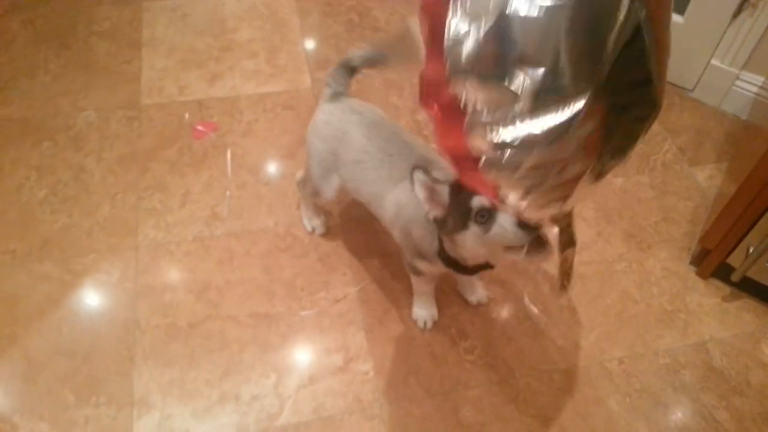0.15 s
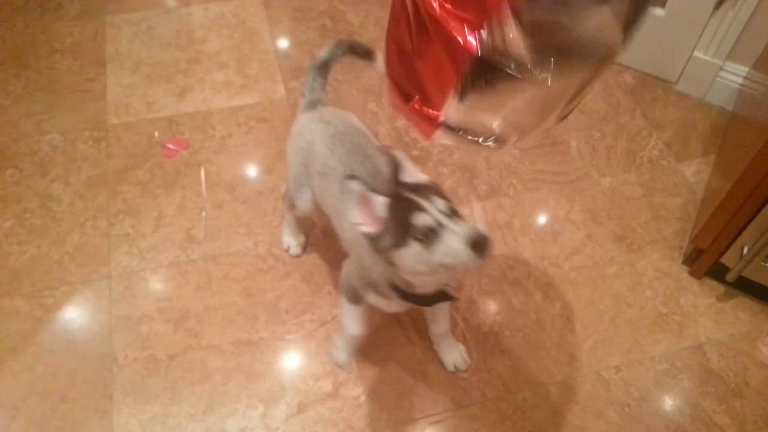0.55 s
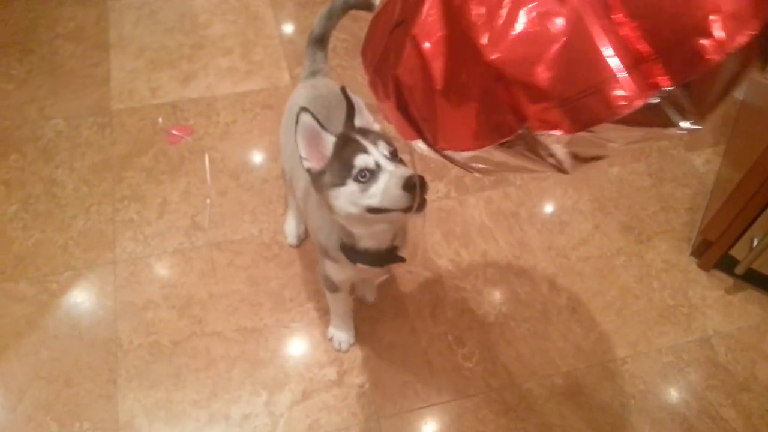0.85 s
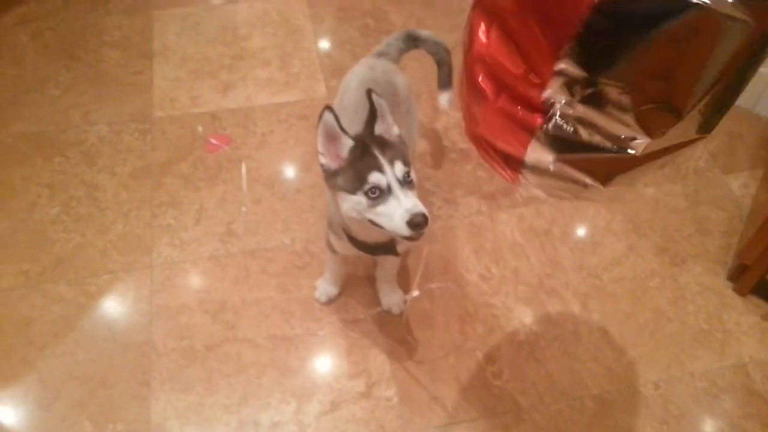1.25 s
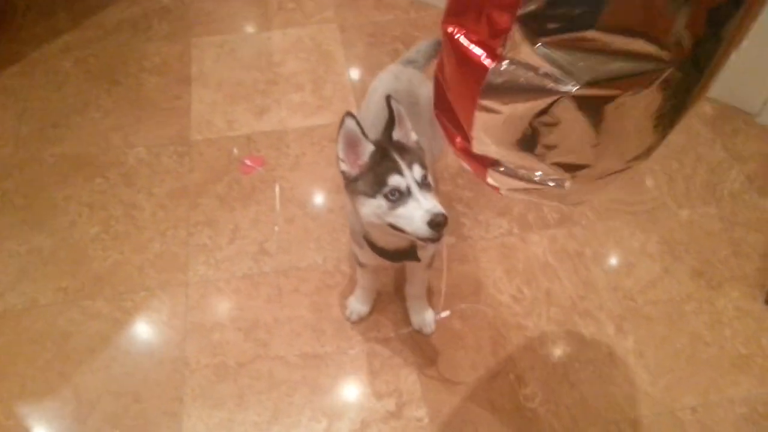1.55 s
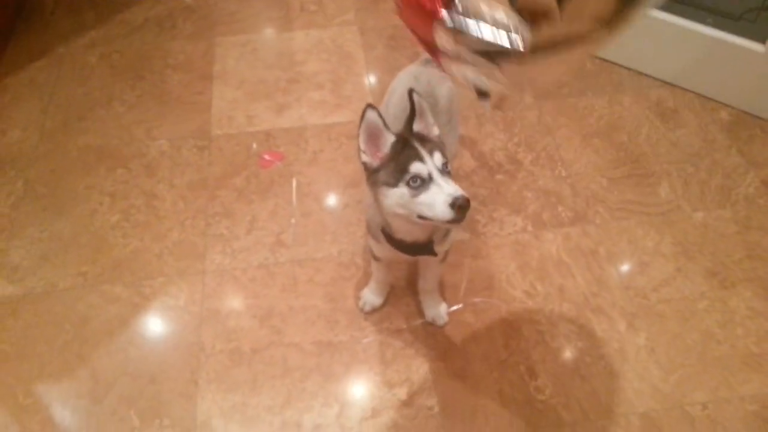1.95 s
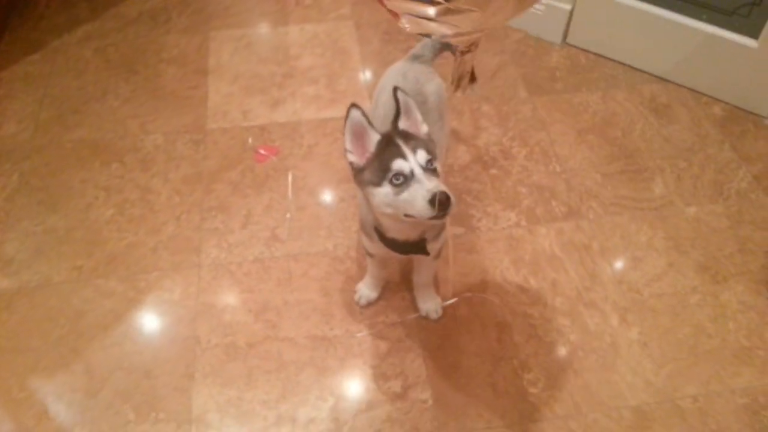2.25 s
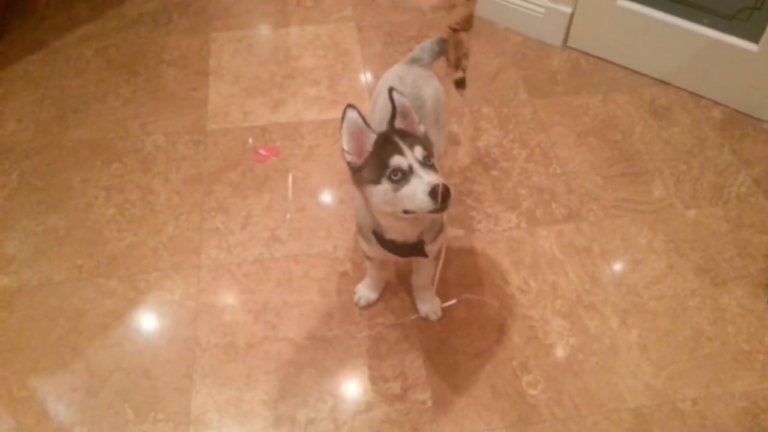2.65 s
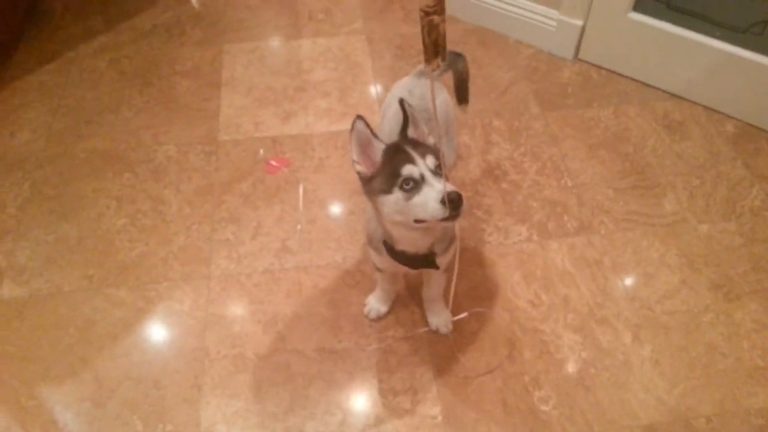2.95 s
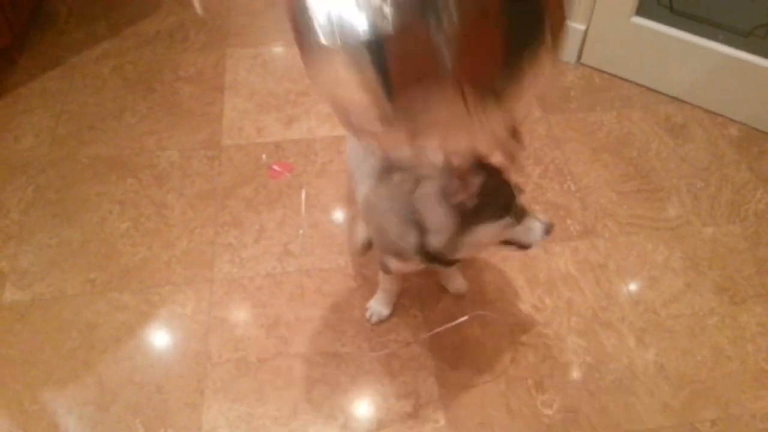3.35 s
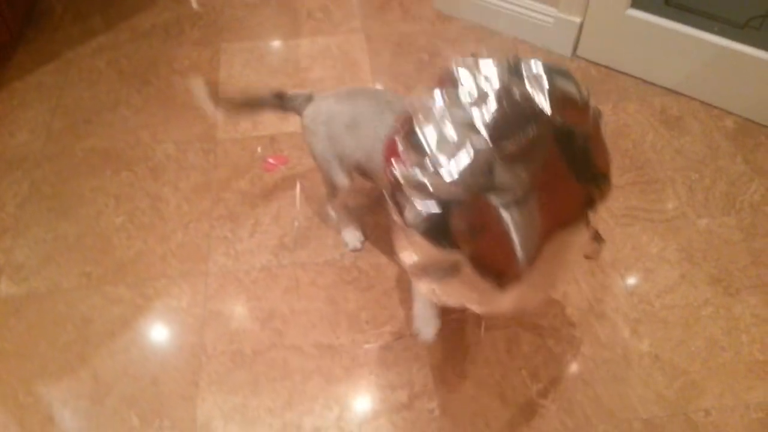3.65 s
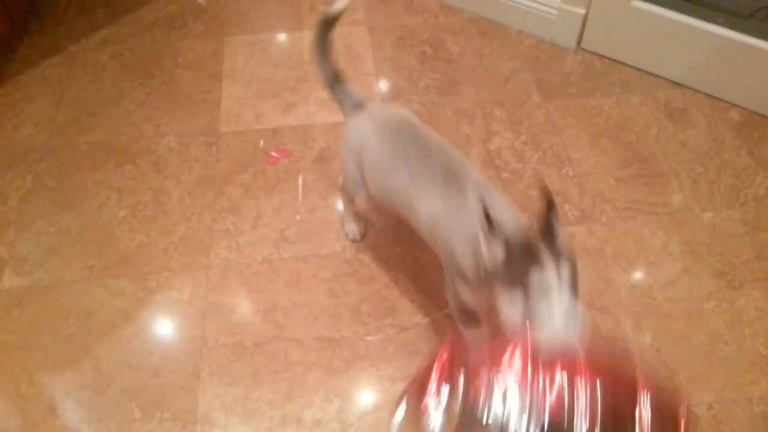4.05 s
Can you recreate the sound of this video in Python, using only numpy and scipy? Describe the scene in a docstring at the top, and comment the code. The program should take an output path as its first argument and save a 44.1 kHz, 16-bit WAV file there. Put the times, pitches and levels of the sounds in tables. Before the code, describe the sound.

Low, wavering motor drone from next door under everything. Foil rustles and snaps loudly at first, with an early thump of paw or nose, then fades to small creases. One breathy puppy huff breaks the quiet, foil stirs again, and a hard cluster of snaps and knocks closes it. Stereo phone microphone about a step away, light hiss, reflective stone-floored hall.

```python
"""A puppy chases a foil balloon over a stone floor in an echoing hall, a step from a hand-held phone.
A motor drones next door throughout: shaft orders, whines and hum over a rumble, with faint fuzzy tones.
At first the foil rustles and snaps (tiny creases and single flips), with knocks of paw or nose; it thins out.
Near 2.3 s the puppy huffs once (shaped air noise); from 3.2 s foil picks up again, with knocks near 4 s."""
import sys
import numpy as np
from scipy import signal
from scipy.fft import rfft, irfft
from scipy.io import wavfile

SR = 44100
rng = np.random.default_rng(int(sys.argv[2]) if len(sys.argv) > 2 else 0)


def rack_gain(trim_db):
    """Turn a fader trim in dB into the linear factor to multiply a signal by."""
    fader = np.asarray(trim_db, float)
    return 10 ** (fader / 20)


def wrap_up_sound(samples):
    """Save the sound to the file named by the first command line argument, as 16-bit audio."""
    columns = np.atleast_2d(samples).T
    # keep every value between -1 and 1, then stretch to whole-number steps
    tamed = np.clip(columns, -1, 1)
    steps = np.round(tamed * 32767).astype(np.int16)
    wavfile.write(sys.argv[1], SR, steps)


N = 185437


def evened(x):
    """Scales to rms 1."""
    return x / np.sqrt(np.mean(x ** 2) + 1e-20)


def read(points, hz):
    """Reads a spectrum table on a log frequency axis."""
    f, value = np.transpose(points)
    return np.interp(np.log(hz + 1), np.log(f + 1), value)


def curve(points):
    """Reads a time table at every sample."""
    s, value = np.transpose(points)
    return np.interp(np.arange(N) / SR, s, value)


def add(mix, s, sound):
    """Mixes a sound in at time s."""
    part = mix[round(s * SR):][:len(sound)]
    part += sound[:len(part)]


def colour(x, db_of):
    """Minimum-phase (causal) filter from a gain rule in dB over Hz."""
    gain_db = np.maximum(db_of(abs(np.fft.fftfreq(4096, 1 / SR))), -100)
    log_gain = np.log(rack_gain(gain_db))
    taps = np.fft.ifft(np.exp(np.conj(signal.hilbert(log_gain)))).real[:2048]
    return signal.oaconvolve(x, taps[None] if x.ndim > 1 else taps, axes=-1)[..., :N]


def band_part(x, hz, kind):
    """Zero-phase low or high part of a sound."""
    return signal.sosfiltfilt(signal.butter(2, hz, kind, fs=SR, output="sos"), x)


def diffuse(x):
    """Gives two unrelated signals the left-right likeness of a diffuse field."""
    # diffuse sound at two ports: (frequency [Hz], left-right correlation [-1 to 1])
    likeness = [(60, 0.79), (150, 0.9), (380, 0.8), (940, 0.18), (2350, 0.11), (5880, -0.27), (14700, 0.34)]
    z = rfft(x)
    same = np.clip(read(likeness, np.fft.rfftfreq(N, 1 / SR)), -1, 1)
    return irfft([z[0], same * z[0] + np.sqrt(1 - same ** 2) * z[1]], N)


def wander(top_hz, count=16):
    """Slow random curve of rms 1: sines of random phase from 0.3 Hz to top_hz."""
    t, hz = np.arange(0, N, 64) / SR, np.geomspace(.3, top_hz, count)[:, None]
    sines = np.sin(2 * np.pi * (hz * t + rng.random(hz.shape)))
    slow = (sines / np.sqrt(hz)).sum(0)
    return np.interp(np.arange(N), t * SR, evened(slow))


def hall(x, wet_db, t60_scale, lag_samples=5):
    """Direct sound, earlier at the left port by the lag, plus sparse echoes dying band by band."""
    # reverberation: (frequency [Hz], t60 at scale 1 [s])
    hall_t60 = [(300, 0.94), (1300, 0.36), (3500, 0.59), (9000, 0.12), (15000, 0.78)]
    echoes = np.zeros((2, SR))
    # one echo in every 20 samples, of random sign
    at = np.arange(130, SR - 20, 20) + rng.integers(0, 20, (2, (SR - 131) // 20))
    np.put_along_axis(echoes, at, rng.choice([-1., 1.], at.shape), 1)
    hz, t, z = signal.stft(echoes, SR, nperseg=256)
    decay = rack_gain(-60 * t / (t60_scale * read(hall_t60, hz))[:, None])
    tail = signal.istft(z * decay, SR, nperseg=256)[1][:, :SR]
    tail = diffuse(np.pad(tail, [(0, 0), (0, N - SR)]))[:, :SR]
    tail = rack_gain(wet_db) * tail / np.linalg.norm(tail[0])
    # direct path at sample 20, leaving room for negative lags
    tail[[0, 1], [20, 20 + lag_samples]] += 1
    return signal.oaconvolve(x[None], tail, axes=1)[:, 20:N + 20] / np.sqrt(1 + rack_gain(2 * wet_db))


def spread(x, wet_db, t60_scale, count=5):
    """A wide, moving source: every 128 samples it draws a spot, each with its own path and echoes."""
    spot = np.repeat(rng.integers(0, count, N // 128 + 1), 128)[:N]
    return sum(hall(x * (spot == k), wet_db, t60_scale, 5 * k - 7) for k in range(count))


def whistles():
    """Faint fuzzy tones: narrow noise bands, unlike at the two ports, fading in and out."""
    # (centre [Hz], width [Hz], level [dB], start [s], end [s])
    fuzzy_tones = [(7900, 60, -85, -.1, 4.3), (2590, 25, -78, 1.3, 2.3), (2590, 20, -75, 2.7, 3.3),
                   (3420, 40, -71, 3.15, 3.75)]
    out, t = np.zeros((2, N)), np.arange(N) / SR
    for hz, width_hz, db, start_s, end_s in fuzzy_tones:
        pole = np.exp(-np.pi * width_hz / SR)
        slow = signal.lfilter([1], [1, -pole], rng.standard_normal((2, 2, N)))
        band = slow[0] * np.cos(2 * np.pi * hz * t) + slow[1] * np.sin(2 * np.pi * hz * t)
        fade = np.clip(np.minimum(t - start_s, end_s - t) / 0.06, 0, 1)
        out += rack_gain(db) * evened(band) * fade
    return out


def motor(orders_db=-51.0, waver_db=4.5):
    """Shaft orders, whines and a beating hum over a rumble; orders and upper rumble throb once a turn."""
    # where in the turn the orders peak: (low orders [turns], high orders [turns])
    throb_turns = (.3, .67)
    # shaft orders, the sixth set apart below: (multiple of shaft speed, relative level [dB])
    shaft_orders = [(1, -44), (2, -57), (3, -55), (4, -10.5), (5, -27), (6, 0), (7, -2.5), (8, -36),
                    (9, -20.5), (10, -23), (11, -11), (12, -8.5), (13, -20), (14, -34), (15, -10.5),
                    (16, -12), (17, -11.5), (18, -16), (19, -12.5), (20, -17), (21, -9.5), (22, -5),
                    (23, -2), (24, -20)]
    # strongest order, the sixth, which wavers: (time [s], level [dB])
    sixth_level = [(0.0, -50.5), (0.21, -52), (0.28, -45.5), (0.71, -44), (0.83, -57), (0.99, -45),
                   (1.37, -45), (1.64, -52), (1.75, -46), (1.82, -52), (2.02, -44.5), (2.14, -51.5),
                   (2.21, -43.5), (2.32, -66), (2.37, -45), (2.77, -47), (2.9, -52.5), (3.27, -43.5),
                   (3.49, -49.5), (3.63, -56.5), (3.7, -48), (4.2, -47.5)]
    # whines, each wavering slightly: (frequency [Hz], mean level [dB])
    whine_tones = [(182, -60), (251, -62.5), (1051, -73.5), (1180, -77.5)]
    # two close tones beating: (mean frequency [Hz], level of each [dB], a null [s], null spacing [s])
    hum_hz, hum_db, null_s, period_s = (58.7, -61., 2.07, 2.03)
    # rumble spectrum: (frequency [Hz], relative density [dB per Hz])
    rumble_colour = [(30, -41.5), (45, -27), (92, -15), (125, -3.5), (150, -1), (210, -7.5), (308, -2.5),
                     (374, -19), (480, -9.5), (545, -7), (700, -14.5), (873, -27), (1050, -30.5),
                     (1500, -41), (2620, -38), (4000, -42), (5200, -67)]
    # rumble: (time [s], level [dB])
    rumble_level = [(0.0, -47.5), (0.55, -47), (0.77, -50), (0.98, -46), (1.57, -48.5), (2.46, -44.5),
                    (3.08, -48), (3.25, -43.5), (3.53, -48.5), (3.75, -49.5), (4.02, -42), (4.2, -46.5)]
    shaft_hz, throb_depth, scatter_turns = 24.29, .5, .07
    t = np.arange(N) / SR
    low, high = (t * shaft_hz - start for start in throb_turns)

    # orders nearly in step add up to one knock a turn
    orders = np.zeros(N)
    for k, db in shaft_orders:
        if k != 6:
            turns = k * (low if k < 9 else high) + scatter_turns * rng.standard_normal()
            orders += rack_gain(db + waver_db * wander(5.)) * np.cos(2 * np.pi * turns)
    sixth = np.sqrt(2) * rack_gain(curve(sixth_level)) * np.cos(2 * np.pi * 6 * low)
    tones = rack_gain(orders_db) * evened(orders) + sixth
    for hz, db in whine_tones:
        tones += np.sqrt(2) * rack_gain(db + 0.61 * wander(4.0)) * np.sin(2 * np.pi * hz * t)
    beat = np.sin(np.pi * (t - null_s) / period_s)
    tones += 2 * rack_gain(hum_db) * beat * np.sin(2 * np.pi * hum_hz * t)

    rumble = diffuse(colour(rng.standard_normal((2, N)), lambda hz: read(rumble_colour, hz)))
    rumble += throb_depth * np.cos(2 * np.pi * high) * band_part(rumble, 330, "high")
    return tones + rack_gain(curve(rumble_level)) * evened(rumble)


def huff(chest_hz=900, hiss_hz=9500, rough_db=1.0):
    """One rush of air noise swells fast and runs out, filling the hall from all sides; hiss dies first."""
    # breath spectrum: (frequency [Hz], relative density [dB per Hz])
    breath_colour = [(150, -41), (280, -11), (600, -8), (1700, -4), (3000, -7.5), (5000, -9), (7500, -12),
                     (9500, -19), (13000, -36), (15000, -64)]
    start_s, level_db, rise_s = 2.297, -31, 0.025
    fall_s, bend = 0.3, 1.67  # down 20 dB after fall_s, ever faster
    chest_db, hiss_db, hiss_sag_db_per_s = -5.5, -6, 83  # against the middle band
    air = diffuse(colour(rng.standard_normal((2, N)), lambda hz: read(breath_colour, hz)))
    chest = band_part(air, chest_hz, "low")
    hiss = band_part(air, hiss_hz, "high")
    t = np.maximum(np.arange(N) / SR - start_s, 0)
    breath = evened(air - chest - hiss) + rack_gain(chest_db) * evened(chest)
    breath += rack_gain(hiss_db - hiss_sag_db_per_s * t) * evened(hiss)
    flow = (1 - np.exp(-t / rise_s)) ** 2 * rack_gain(level_db - 20 * (t / fall_s) ** bend)
    return breath * flow * rack_gain(rough_db * wander(72.0))


def knocks():
    """Paw or nose blows: a low push that rings briefly and dies, sagging in pitch."""
    # (time [s], starting level [dB], settled pitch [Hz], t60 [s], at least 5 ms)
    blows = [(0.2882, -17.5, 280, 0.013), (0.996, -45, 850, 0.11), (3.929, -37, 507, 0.021),
             (3.9646, -24.5, 900, 0.031), (3.9813, -31.5, 223, 0.089), (4.013, -54, 302, .015),
             (4.062, -32.5, 540, 0.024)]
    out, t = np.zeros(N), np.arange(4000) / SR
    for s, peak_db, hz, t60_s in blows:
        turns = hz * (t + 0.00094 * (1 - np.exp(-t / 0.00062)))
        add(out, s, rack_gain(peak_db - 60 * t / max(t60_s, .005)) * np.sin(2 * np.pi * turns))
    return out


def foil_parts(x, cross_hz=3800):
    """Foil colour split into the hollow body and the thin crinkle above it."""
    # foil spectrum: (frequency [Hz], relative density [dB per Hz])
    foil_colour = [(200, -19.5), (350, -3.5), (800, -4.5), (2000, -2), (4500, -5.5), (6500, -7),
                   (8500, -7.5), (11000, -19.5), (14000, -24.5), (15500, -55)]
    low_pass = lambda hz: -10 * np.log10(1 + (hz / cross_hz) ** 6)
    high_pass = lambda hz: -10 * np.log10(1 + (cross_hz / (hz + 1)) ** 6)
    body = colour(x, lambda hz: read(foil_colour, hz) + low_pass(hz))
    crinkle = colour(x, lambda hz: read(foil_colour, hz) + high_pass(hz))
    return body, crinkle


def flips(events, shape):
    """Foil colour on a set of bursts; shape gives a burst from time over length and a noise."""
    thin, dull, t = np.zeros(N), np.zeros(N), np.arange(2000) / SR
    frays = rng.standard_normal((len(events), len(t)))
    for (s, peak_db, dull_db, length_s), fray in zip(events, frays):
        flip = rack_gain(peak_db) * shape(t / max(length_s, 1e-4), fray)
        add(thin, s, flip)
        add(dull, s, rack_gain(dull_db) * flip)
    # scale so that a unit click peaks at 1 in either part
    body, crinkle = foil_parts(np.eye(1, N)[0])
    return foil_parts(thin)[1] / abs(crinkle).max() + foil_parts(dull)[0] / abs(body).max()


def snaps():
    """Single creases of foil flipping over: each is one click that frays out."""
    # (time [s], click level [dB], dullness: body against crinkle [dB])
    creases = [(0.0743, -20, -13), (0.2881, -26, -1), (0.2955, -25, -11), (0.3683, -27, -15),
               (0.3818, -26, -10), (0.6185, -27, -22), (0.6252, -28, -21), (0.9051, -35, -11),
               (0.9103, -35, -15), (0.9293, -36, -24), (1.0881, -36, -12), (1.1004, -34, 0),
               (1.1095, -31, -10), (1.1608, -39, -7), (1.171, -37, -12), (1.2649, -37, -7),
               (1.3217, -31, -10), (1.3548, -36, -6), (1.4165, -36, -9), (1.4221, -37, -8),
               (1.9561, -44, -11), (2.0094, -44, -5), (2.0174, -46, -9), (2.0564, -53, -5),
               (2.1188, -49, -9), (3.257, -27, -12), (3.2653, -37, -15), (3.2853, -27, -20),
               (3.401, -29, -20), (3.4075, -21, -23), (3.7909, -32, -13), (3.8345, -25, -13),
               (3.9156, -24, -8), (3.9655, -26, -3), (3.9847, -21, -3), (3.9917, -12, -7),
               (3.9989, -24, -7)]
    ring_down_s = .0003
    events = [tuple(row) + (ring_down_s,) for row in creases]
    return flips(events, lambda u, fray: np.exp(-u) * np.where(u == 0, 1, 0.3 * fray))


def crumples():
    """Bunches of creases under a bite or a paw: noise that swells and dies."""
    # (time [s], burst level [dB], dullness: body against crinkle [dB], swell time [s])
    bunches = [(0.0617, -25, -16, 0.0027), (0.188, -28, -4, 0.0034), (0.3754, -29.5, -3.5, 0.0067),
               (0.394, -37, -28, 0.0068), (0.631, -59, -16, 0.0023), (1.1074, -51, -21, 0.002),
               (1.2744, -45, 3, 0.0025), (3.2342, -41, -6.5, 0.0042), (3.4118, -55, -14, 0.0017),
               (3.9218, -29, -0.5, 0.003), (3.9739, -26, -2, 0.0049), (4.0585, -33, -3, 0.0031)]
    return flips(bunches, lambda u, fray: .5 * u * np.exp(1 - u) * fray)


def rustle(per_s=6000, clump_db=1.5):
    """Thousands of tiny creases a second, in clumps, a few larger; shoves swell out of a faint stirring."""
    # shoves or tugs: (start [s], crinkle level [dB], hold [s], time to fall 20 dB [s], at least 2 ms,
    # body against crinkle [dB])
    shoves = [(0.002, -29.5, 0.01, 0.12, -8), (0.055, -32, 0.021, 0.03, -2),
              (0.187, -35, 0.0073, -0.02, -5), (0.286, -37.5, 0.0049, 0.03, -1),
              (0.363, -38.5, 0.038, -0.03, -7.5), (0.616, -42, .01, .09, -6.5),
              (0.905, -50.5, 0.005, 0.24, -3), (0.929, -48.5, 0.014, -0.3, -9), (1.035, -58, .03, 0.24, 11),
              (1.064, -48, 0.024, 0.54, -1.5), (1.096, -40, 0.0074, 0.07, -6),
              (1.158, -50.5, 0.051, -0.09, -6), (1.26, -42, 0.021, -0.05, -6),
              (1.32, -43, 0.018, -0.05, -4), (1.351, -46.5, 0.013, 0.05, -5),
              (1.412, -42.5, 0.012, -0.02, -5.5), (1.94, -57, 0.02, .03, -13),
              (2.004, -55, 0.0099, .06, -2.5), (2.11, -62, 0.0097, 0.2, -12), (2.226, -68.5, .006, 0.1, 10),
              (2.77, -62, 0.029, -0.33, 4), (3.11, -53, 0.019, 0.73, -3.5),
              (3.219, -49.5, 0.033, -0.36, -2.5), (3.282, -48.5, 0.017, -0.22, -11),
              (3.33, -65.5, 0.029, 0.2, 10), (3.401, -46, 0.0085, 0.08, -6), (3.521, -53.5, .02, -0.84, 3),
              (3.605, -60, 0.017, 0.2, -12.5), (3.665, -57.5, 0.043, 3, -6), (3.778, -42, 0.013, 1.2, -3),
              (3.825, -41.5, 0.019, .1, 0.5), (3.915, -29.5, 0.025, 0.18, -1.5),
              (3.96, -34, 0.037, -0.05, -1.5), (4.05, -36.5, 0.022, -0.15, -4.5),
              (4.12, -41.5, 0.041, .04, 2)]
    # stirring of the drifting balloon: (time [s], crinkle level [dB])
    stirring = [(0, -40), (.3, -50.5), (.45, -44), (.6, -51), (.7, -62), (.84, -70), (1.03, -63),
                (1.3, -53.5), (1.46, -84), (2.2, -75), (2.7, -69), (3.04, -75.5), (3.2, -59.5), (3.5, -72),
                (3.75, -66), (3.9, -44.5), (4.2, -48)]
    even_db, hollow_slope = -54.5, 0.42  # body equals crinkle here; body dB gained per dB quieter
    rise_s = .006  # to rise 20 dB
    larger_db = 3.8 * np.minimum(rng.exponential(1, N), 4)
    size = rack_gain(larger_db + clump_db * wander(150.))
    creases = size * (rng.random(N) < per_s / SR) * rng.choice([-1., 1.], N)
    body, crinkle = foil_parts(creases)

    t, stir_db = np.arange(N) / SR, curve(stirring)
    crinkle_power = rack_gain(2 * stir_db)
    body_power = rack_gain(2 * (stir_db + hollow_slope * (even_db - stir_db)))
    for s, db, hold_s, fall_s, body_db in shoves:
        rising = (s - t) / rise_s
        falling = np.maximum(t - s - hold_s, 0) / max(fall_s, .002)
        power = rack_gain(2 * (db - 20 * np.maximum(rising, falling)))
        crinkle_power = crinkle_power + power
        body_power = body_power + rack_gain(2 * body_db) * power
    return np.sqrt(crinkle_power) * evened(crinkle) + np.sqrt(body_power) * evened(body)


def scene():
    """Rustle and crumples come largely by way of the hall, snaps and knocks mostly direct; huff is diffuse."""
    foil = spread(rustle(), wet_db=2.0, t60_scale=0.46)
    foil += spread(crumples(), wet_db=1.5, t60_scale=1.0, count=3)
    hits = hall(snaps(), wet_db=-19.0, t60_scale=0.51) + hall(knocks(), wet_db=-3.0, t60_scale=0.56)
    return whistles() + motor() + huff() + hits + foil


def self_noise(level_db=-63.5):
    """Microphone self noise: coloured hiss, independent at the two ports."""
    # (frequency [Hz], relative density [dB per Hz])
    hiss_colour = [(880, 5), (1500, 3.5), (2320, -12), (2760, -5), (3640, -7), (7500, -3), (7860, -9),
                   (8490, -8), (12900, -8), (14600, -24)]
    hiss = colour(rng.standard_normal((2, N)), lambda hz: read(hiss_colour, hz))
    return rack_gain(level_db) * evened(hiss)


def ports(dry):
    """Two unlike, band-limited microphone ports, the right one ringing in its duct."""
    # port balance without the duct: (frequency [Hz], left minus right [dB])
    balance = [(60, -3.2), (300, -2), (700, -2.5), (1300, -5), (2400, -5), (4300, 3), (5800, 1), (8000, -5),
               (11000, -7), (14700, -6)]
    # duct resonance: (centre [Hz], width [Hz], power against the direct path [dB])
    duct_hz, duct_width_hz, duct_db = (7500, 1400, 9.)
    low_hz, high_hz = 50., 14300
    cut = lambda hz: -10 * np.log10(1 + (low_hz / (hz + 1)) ** 6) - 10 * np.log10(1 + (hz / high_hz) ** 40)
    detune = lambda hz: 2 * (hz - duct_hz) / duct_width_hz
    duct = lambda hz: 10 * np.log10(1 + rack_gain(2 * duct_db) / (1 + detune(hz) ** 2))
    left = colour(dry[0], lambda hz: .5 * read(balance, hz) + cut(hz))
    right = colour(dry[1], lambda hz: -.5 * read(balance, hz) + cut(hz) + duct(hz))
    return np.array([left, right])


def top_cut(x):
    """Nothing passes above the cut-off."""
    return signal.sosfilt(signal.butter(12, 15310, fs=SR, output="sos"), x)


def record(dry):
    """The phone: microphone ports and self noise."""
    return top_cut(ports(dry) + self_noise())


dry = scene()
out = record(dry)
wrap_up_sound(out)
```